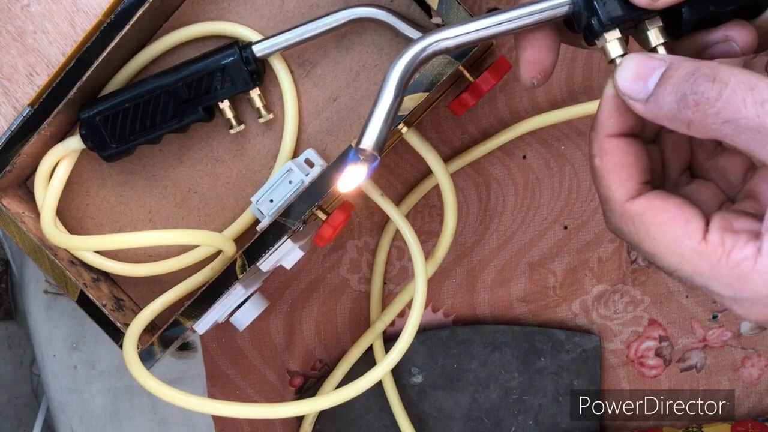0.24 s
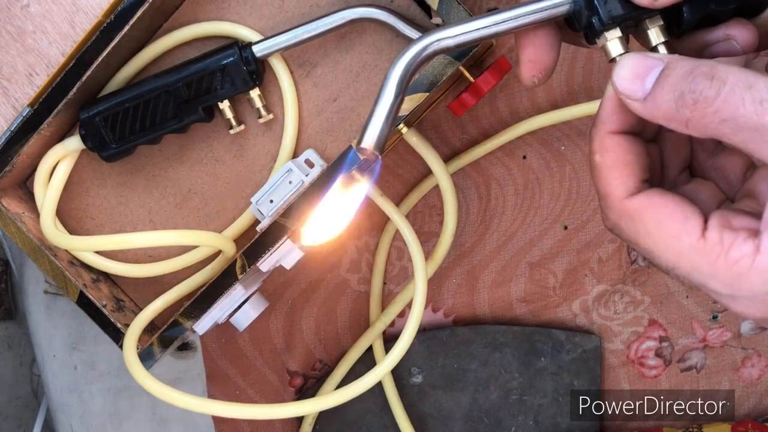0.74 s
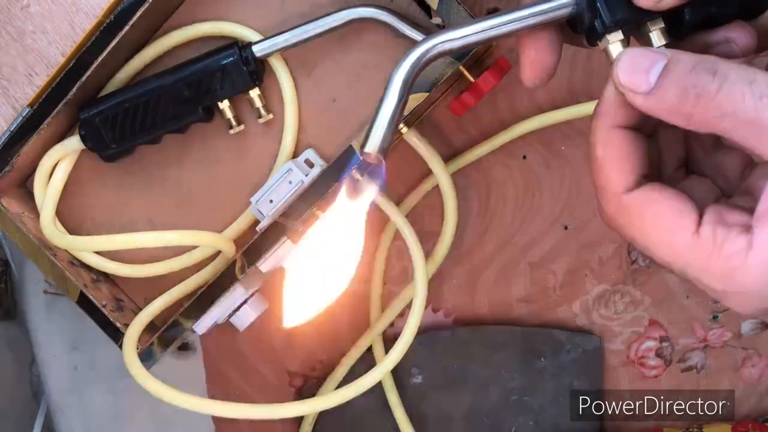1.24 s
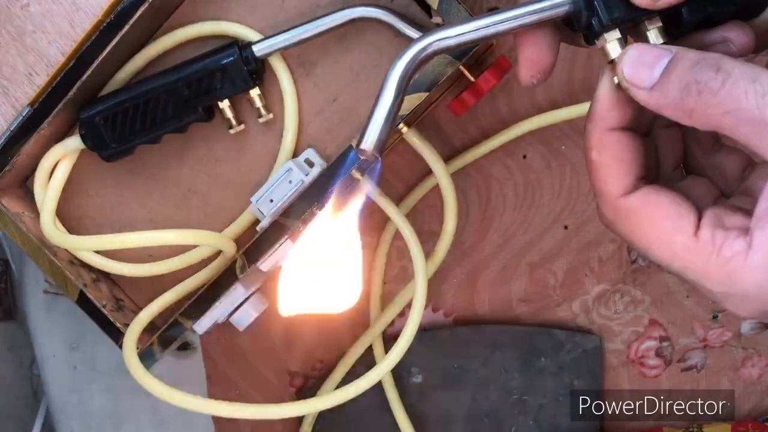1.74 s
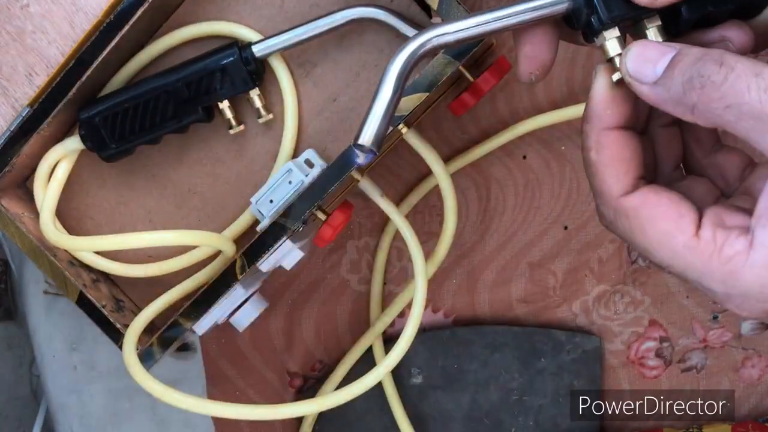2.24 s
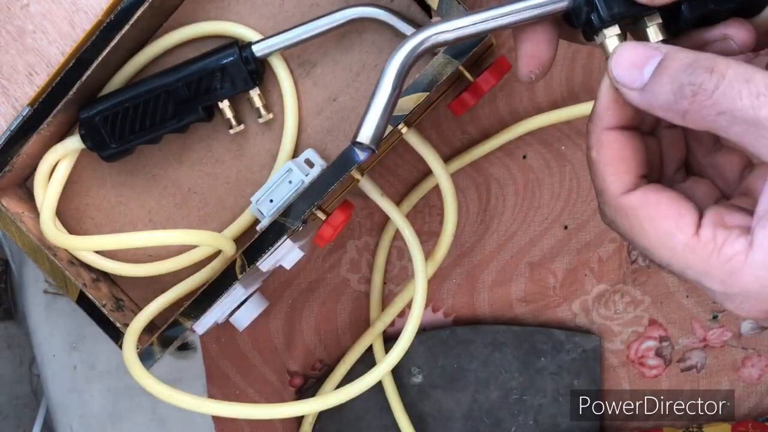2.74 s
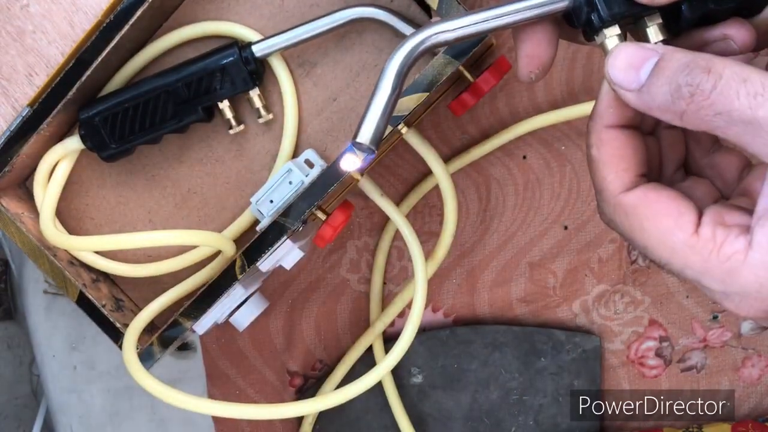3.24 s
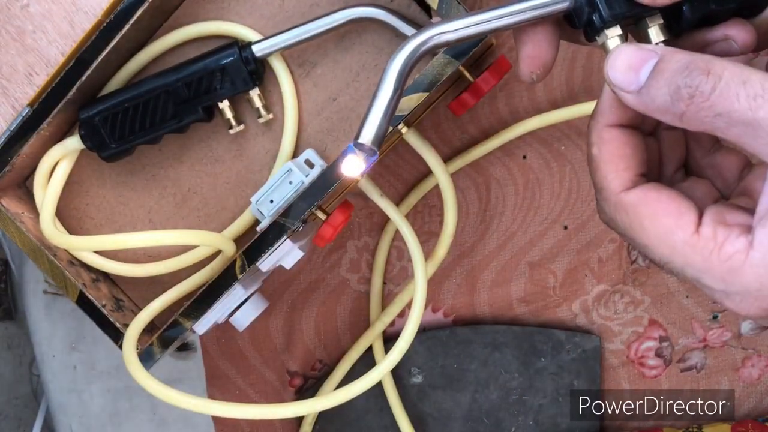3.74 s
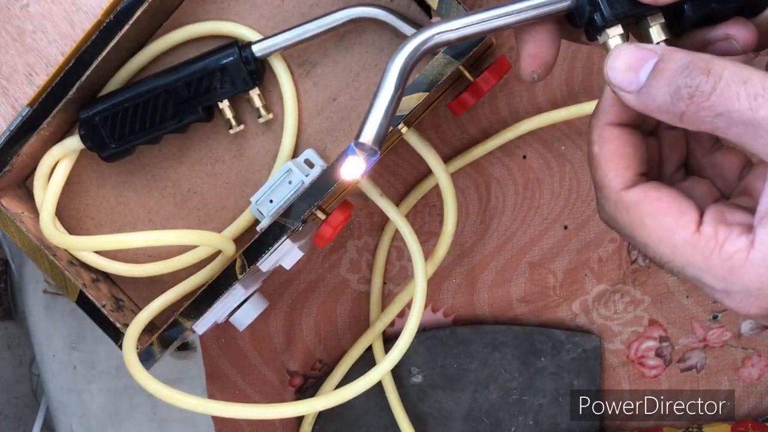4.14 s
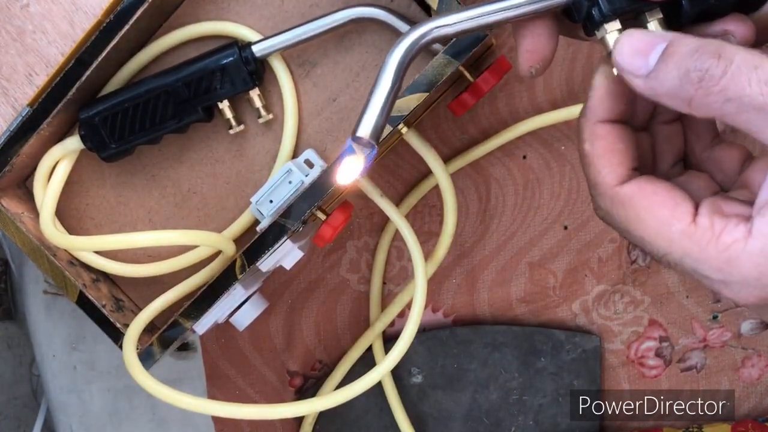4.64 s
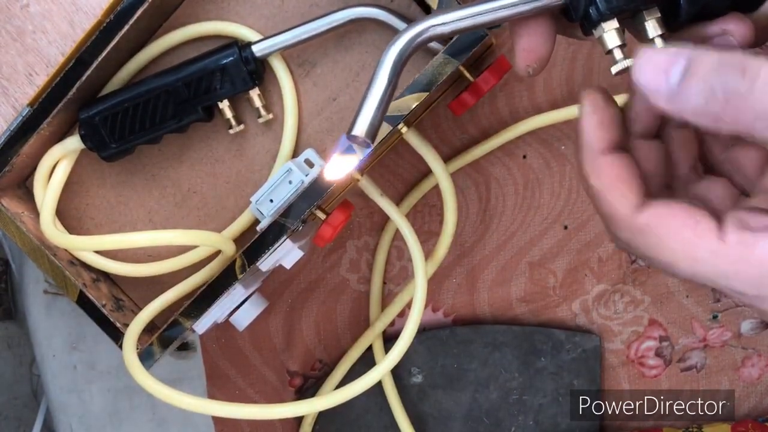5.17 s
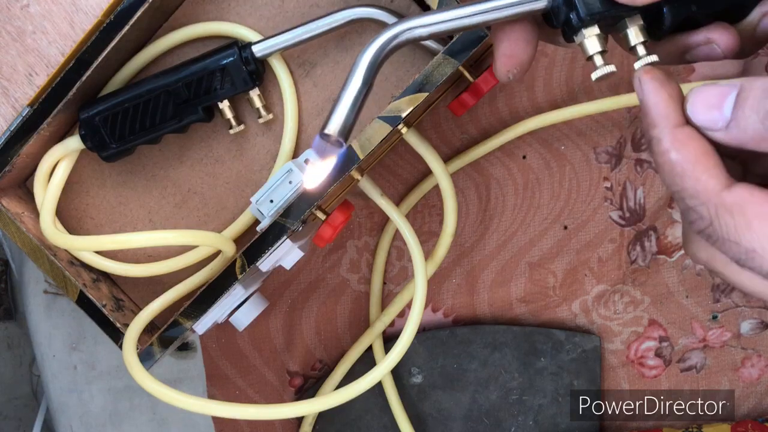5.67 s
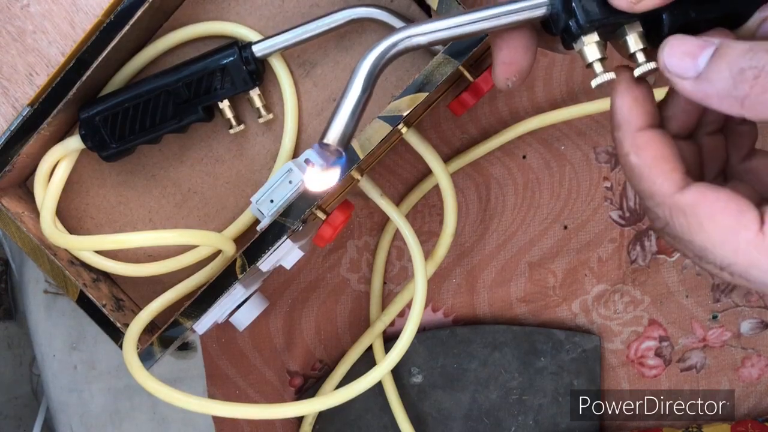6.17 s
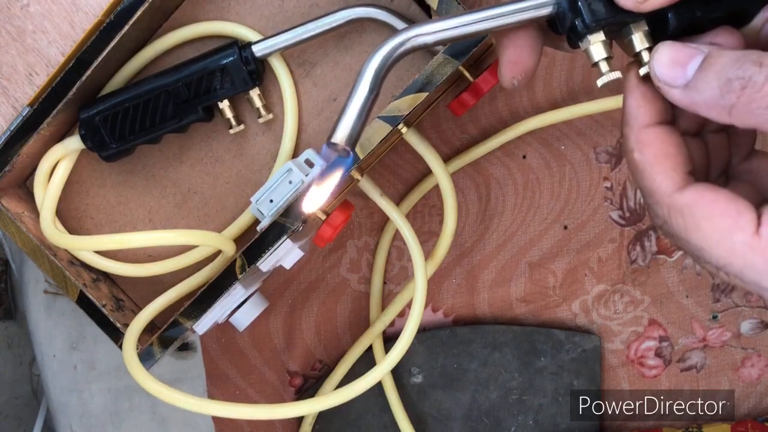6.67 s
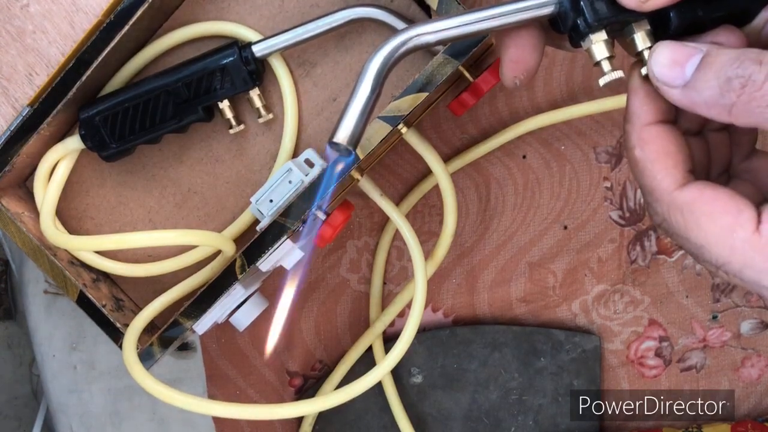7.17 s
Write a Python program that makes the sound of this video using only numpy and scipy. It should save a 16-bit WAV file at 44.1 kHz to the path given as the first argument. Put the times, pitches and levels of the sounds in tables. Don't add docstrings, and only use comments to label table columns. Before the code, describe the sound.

Low electrical pump hum and distant engine drone underlie a gas flame that creaks, puffs near two seconds, then roars and hisses harder.

```python
import sys
import numpy as np
from scipy import signal
from scipy.fft import rfft, irfft, next_fast_len
from scipy.io import wavfile

SR = 44100
rng = np.random.default_rng(int(sys.argv[2]) if len(sys.argv) > 2 else 0)


def boost(x):
    u = np.asarray(x, float) / 20
    return 10 ** u


def dump(signal):
    limited = np.clip(np.atleast_2d(signal).T, -1, 1)
    pcm = np.round(limited * 32767).astype(np.int16)
    wavfile.write(sys.argv[1], SR, pcm)


N = 326781
TIME = np.arange(N) / SR

# time in seconds, firing rate in Hz, level in dB.
ENGINE = [(0, 61.1, -35), (.3, 63.79, -32.5), (.76, 68.04, -30.5), (1.1, 68.98, -33.5), (1.8, 69.65, -35),
          (2.0, 70.63, -40.5), (2.2, 71.22, -33.5), (2.7, 70.14, -45), (3.1, 72.14, -34.5),
          (3.55, 71.82, -41.5), (3.85, 69.66, -29), (4.25, 68.41, -27.5), (4.62, 67.28, -29),
          (4.9, 65.82, -40), (5.2, 62.72, -31), (5.5, 61.8, -38.5), (5.75, 58.9, -30), (6.0, 59.83, -36),
          (6.35, 60.68, -31.5), (6.7, 59.76, -37.5), (7.0, 60.55, -31), (7.41, 59.16, -31)]
# time in seconds, firing rate in Hz, level in dB.
OTHER_ENGINE = [(5.3, 62.5, -60), (5.55, 66.7, -35), (5.8, 63.9, -46), (6.0, 67.6, -33), (6.2, 69.35, -41),
                (6.45, 74.7, -32.5), (6.62, 72.3, -47), (6.8, 70.3, -36), (6.92, 65.9, -48),
                (7.1, 68.9, -34), (7.41, 69.5, -45)]
# frequency in Hz, density in dB per Hz.
RUMBLE_COLOUR = [(25, -56), (42, -12.5), (71, -6.5), (82, -16.5), (102, -13.5), (150, -23.5), (200, -26.5),
                 (214, -39.5), (247, -50.5), (352, -32.5), (406, -44), (500, -53), (650, -54), (1100, -120)]
# start in seconds, length in seconds, level in dB.
SWELLS = [
    (.1, 0.45, -37),
    (4.4, 0.9, -34.5),
    (5.75, 0.27, -31),
    (6.45, 0.29, -30),
]

MAINS_HZ = 50.05
# time in seconds, level in dB.
HUM = [(0.1, -28.5), (0.7, -27), (1.3, -25.5), (1.9, -25.5), (2.5, -28), (3.1, -28), (3.7, -27.5),
       (4.3, -28), (4.9, -27), (5.5, -28), (6.1, -27.5), (6.7, -28), (7.3, -27)]
# multiple, resonance 0-5, level in dB within it, share of the lean.
HARMONICS = [(6, 0, -5, 0), (7, 0, -2, 0), (5, 3, -9, 0), (10, 5, -6, 0), (15, 5, -7, 0), (9, 0, -18, 0),
             (4, 4, -3, 0), (11, 1, -4, 0), (12, 2, -10, -.55), (13, 2, -4, -.4), (14, 2, -4, .4),
             (16, 2, -14, 0), (18, 3, -5, 0), (19, 3, -2, 0), (20, 3, -11, 0), (21, 3, -13, 0),
             (22, 3, -11, 0)]
JOLT_S = [.0054, .0085, .0077, .0048, .0082, .0077]
# time in seconds, load in dB, panel rattle in dB, panel lean low to high in dB.
PUMP_LOAD = [(0, 1.5, -2.5, -6), (.35, -0.5, 4.5, -9), (.5, 3.5, -5, 0), (.6, 0, 7.5, 8), (1.0, 4.5, 7, 7),
             (1.2, -1, 5.5, -3), (1.5, 2.5, 6.5, 4), (1.85, -1, 5.5, -5), (2.05, 2.5, 10, 2),
             (2.22, 5.5, 1, 10), (2.33, -6, 5, -2), (2.55, -6, -2, -9), (3.2, -9, 0.5, 4),
             (3.45, -8, 6.5, 3), (3.62, -8, 10, 1), (3.8, -2.5, 7, -7), (4.0, -1, 1, -7),
             (4.25, -1.5, -0.5, -11), (4.5, 1, -7.5, -18), (5.0, 3, -0.5, 1), (5.8, 1.5, 0, 5),
             (6.5, 1, -1.5, 4), (7.1, 4, 7, 6), (7.41, 4.5, 6, 5)]
# level in dB, share of the load, share of the rattle.
CASING = [
    (-52, 0.84, 0.042),
    (-52, 0.24, 0.94),
]
# time in seconds, base in dB, bracket in dB, grille in dB.
PARTS = [(0, -46, -48.5, -59), (.65, -59, -50, -56), (.85, -60, -62, -54.5), (1.2, -54, -52, -52.5),
         (1.85, -53.5, -52.5, -51), (2.05, -51, -58, -54.5), (2.45, -49, -53, -61), (2.65, -47.5, -49, -70),
         (3.05, -52, -50.5, -69), (3.4, -50.5, -52, -59), (3.9, -49, -50.5, -73), (4.6, -55, -49.5, -58),
         (5.0, -54.5, -51, -57), (5.9, -48.5, -48.5, -55), (6.3, -49, -47, -56), (6.7, -53, -51, -57),
         (6.9, -47.5, -47, -54), (7.41, -60, -69, -51)]
# time in seconds, peak in dB.
ARMATURE_TICKS = [(0.1818, -75), (0.2037, -73), (0.2835, -71), (0.4038, -72), (0.5604, -67), (0.7195, -69),
                  (1.0194, -70), (1.0628, -67), (1.1191, -70), (1.3192, -68), (1.3636, -71), (1.401, -70),
                  (1.4594, -66), (1.4798, -66), (1.5397, -68), (1.5801, -67), (1.6389, -67), (1.6789, -69),
                  (1.6988, -69), (1.7188, -70), (1.7407, -64), (1.818, -64), (1.8604, -69), (1.8809, -69),
                  (1.9183, -67), (1.9807, -67), (2.0625, -66), (2.0994, -68), (2.1204, -67), (2.2181, -70)]

# time in seconds, peak in dB, pitch in Hz.
CREAKS = [
    (0.1457, -46, 2860),
    (0.206, -42, 2700),
    (0.285, -43, 2860),
    (0.2914, -46, 2080),
    (0.3476, -38, 2920),
    (0.4064, -45, 2460),
]
# time in
# seconds, pitch in Hz, width in Hz (0 for a pure note), length in seconds, level in dB.
PUFFS = [(1.9, 175, 0, .02, -42), (1.903, 340, 0, .022, -43), (1.92, 460, 0, .015, -51),
         (1.904, 255, 0, .008, -44), (2.078, 185, 0, .014, -39), (1.865, 175, 0, .015, -48),
         (1.95, 365, 0, .015, -50), (2.03, 190, 0, .025, -46), (2.0, 325, 0, .025, -48),
         (2.12, 310, 80, .04, -52), (2.045, 850, 350, .05, -49), (2.16, 175, 0, .02, -48),
         (1.5, 62, 0, .17, -41), (2.4, 88, 0, .12, -49), (3.4, 86, 0, .12, -47), (2.9, 250.25, 0, .5, -64),
         (3.3, 175, 0, .06, -52), (4.35, 175, 0, .06, -52), (4.5, 135, 0, .08, -49),
         (4.2, 620, 0, .09, -57), (5.65, 480, 25, .07, -55), (6.94, 1480, 0, .02, -56),
         (.3, 3700, 150, .16, -72), (.33, 1650, 300, .03, -64), (.3, 142, 50, .17, -45),
         (2.75, 143, 0, .14, -47), (3.05, 188, 0, .06, -50), (3.42, 143, 0, .12, -47),
         (5.1, 190, 0, .1, -50), (5.39, 545, 0, .04, -52), (7.33, 410, 40, .05, -52),
         (6.64, 964, 0, .125, -52), (6.88, 965, 0, .04, -58), (2.08, 1600, 900, .04, -63),
         (3.05, 1550, 400, .5, -64), (3.05, 106, 0, .1, -46), (2.1, 720, 200, .06, -53),
         (.31, 3400, 3500, .14, -65), (.065, 12500, 3000, .003, -69), (6.7, 1320, 0, .12, -59)]
# pitch in Hz, width in Hz, level in dB.
WHISTLES = [(8550, 150, -12), (11000, 200, -14), (12670, 150, -14), (14080, 260, -6), (15450, 450, -6)]
# start in seconds, length in seconds, top whistle in dB, lower whistles in dB.
VALVE_SPELLS = [
    (0, .55, -82, -95),
    (.55, 0.4, -79, -89),
    (.97, .2, -75, -80),
    (1.22, .1, -82, -90),
    (1.37, .2, -72, -77),
    (1.58, .24, -73, -75),
    (1.82, 0.1, -78, -76),
    (1.92, .14, -78, -84),
]
# start in seconds, length in seconds, level in dB.
NOZZLE_SPELLS = [
    (5.12, 0.19, -57),
    (6.12, 0.23, -57),
    (7.0, 0.17, -52.5),
    (7.32, 0.09, -54),
]
# start in seconds, length in seconds, level in dB.
EDGE_SPELLS = [
    (5.27, .38, -81),
    (5.7, 1.0, -80),
    (6.7, .8, -77),
]

# time in seconds, flow in dB.
FLOW = [(0, -4.5), (.55, -4), (1.2, -4), (1.6, -1.5), (1.9, -2.5), (2.3, -1.5), (2.8, 1), (3.55, 2.5),
        (4.0, 3), (4.5, 3.5), (5.2, 3), (5.8, 1.5), (6.2, 1.5), (6.6, 3), (7.1, 5), (7.41, 6.5)]
# time in seconds, length in seconds, rise in dB.
FLARES = [
    (0.3, 0.093, 5.5),
    (2.06, 0.18, 6),
]
# level in dB, share of the flow, share of a flare, gain when blue in dB,
# gain with full air in dB.
LAYERS = [
    (-53, 0.45, 0.71, 2.5, 1),
    (-54.5, 0.98, 0.52, -1, 2.5),
    (-60, 1, 0.43, 0.78, 0.04),
    (-66, 0.96, 0.22, -0.43, 0.2),
]
# frequency in Hz, density in dB per Hz.
LOW_ROAR = [(150, -9), (225, -11), (270, -10), (349, -16), (411, -12), (546, -9), (832, -14), (1100, -15),
            (1430, -21.5), (2420, -120)]
# frequency in Hz, density in dB per Hz.
ROAR = [(530, -54), (900, 2.5), (921, 4), (1000, 2), (1100, -6), (1490, 0), (1970, -7), (2090, -14.5),
        (2270, -12), (2700, -22), (3510, -50), (5940, -120)]
# frequency in Hz, density in dB per Hz.
LEAN_ROAR = [(530, -52), (900, -11), (925, 1), (973, -4), (1090, -10.5), (1350, -5.5), (1600, -9.5),
             (1950, -10.5), (2150, -20), (2700, -16), (3510, -26), (5940, -120)]
# frequency in Hz, density in dB per Hz.
HISS = [(1410, -19), (2400, -1.5), (2710, -3), (3310, 1), (4190, -6), (4960, -11.5), (6250, -7.5),
        (7800, -17.5), (10100, -56), (17200, -120)]
# frequency in Hz, density in dB per Hz.
LEAN_HISS = [(1410, -23), (2400, -2), (2770, -4.5), (3000, -1.5), (3560, -4), (4860, -11), (5420, -8.5),
             (7800, -19), (10100, -27), (17200, -120)]
# frequency in Hz, density in dB per Hz.
JET = [(4290, 2), (7300, -4.5), (7770, -3), (9650, -2), (10400, -2.5), (15100, -2.5), (16000, -0.5)]
# delay in seconds, level in dB.
ECHOES = [(.0083, -27), (.0131, -27), (.0197, -28)]
# frequency in Hz, width
# in Hz, gain at the centre in dB.
PORT_RESONANCES = [(2100, 330, 2.5), (4950, 230, -1.5), (7720, 630, -4), (10400, 630, -5.5)]


def in_time(rows):
    s, *columns = np.transpose(rows)
    return [np.interp(TIME, s, column) for column in columns]


def rms_one(x):
    return x / np.sqrt(np.mean(x ** 2) + 1e-20)


def drift(rate):
    r = np.exp(-80 * np.pi * rate / SR)
    noise = rng.standard_normal(N // 40 + 2002)
    slow = signal.lfilter([1], [1, -2 * r, r * r], noise)[2000:]
    return np.interp(np.arange(N) / 40, np.arange(len(slow)), rms_one(slow))


def spells(rows, fade_s, column=2):
    gain = np.zeros(N)
    for row in rows:
        start, length = row[:2]
        inside = np.minimum(TIME - start, start + length - TIME)
        gain += boost(row[column]) * np.clip(inside / fade_s + .5, 0, 1)
    return gain


def coloured(spectrum, flicker_db, rate, grain_db=0):
    hz, level_db = np.transpose(spectrum)
    size = next_fast_len(N)
    grid = np.arange(size // 2 + 1) * SR / size + 1e-3
    colour = boost(np.interp(np.log(grid), np.log(hz), level_db, -120, -120))
    shaped = rfft(rng.standard_normal(size)) * colour
    place = np.clip(2 * np.log(grid / hz[0]) / np.log(hz[-1] / hz[0]), 0, 2)
    together = drift(rate)
    out = np.zeros(N)
    for k in range(3):
        band = irfft(shaped * np.clip(1 - abs(place - k), 0, 1), size)[:N]
        out += band * boost(flicker_db * (together + drift(2 * rate)) + grain_db * drift(69))
    return rms_one(out)


def resonance(x, hz, width_hz):
    r = np.exp(-np.pi * width_hz / SR)
    poles = [1, -2 * r * np.cos(2 * np.pi * hz / SR), r * r]
    return signal.lfilter(np.array([1, 0, -1]) * (1 - r * r) / 2, poles, x)


def twice_resonant(x, hz, width_hz):
    return resonance(resonance(x, hz, width_hz), hz, width_hz)


def tone(hz, level_db, wobble=0.):
    phase = 2 * np.pi * np.cumsum(hz + 0 * TIME) / SR
    return np.sqrt(2) * boost(level_db) * np.cos(phase + wobble)


def street():
    hz, level_db = in_time(ENGINE)
    other_hz, other_db = in_time(OTHER_ENGINE)
    engines = tone(hz, level_db, .35) + tone(other_hz, other_db, .1 * drift(3.1))
    near = np.clip((TIME - 5.0) / 1.7, .03, 1)
    engines += near * tone(90.15, -40 + 1.2 * drift(3.1), 2.44 + .2 * drift(3.1))
    rumble_gain = np.hypot(boost(-37.5), spells(SWELLS, 1.0))
    rumble = rumble_gain * coloured(RUMBLE_COLOUR, flicker_db=0.53, rate=2.7)
    return engines + signal.sosfilt(signal.butter(6, 46, "high", fs=SR, output="sos"), rumble)


def pump():
    out = tone(MAINS_HZ, in_time(HUM)[0] + .3 * drift(3.8), 1.9)
    out += tone(2 * MAINS_HZ, -46 + .6 * drift(3.0), -2.3 + .2 * drift(3.0))
    load_db, rattle_db, lean_db = in_time(PUMP_LOAD)
    base_db, bracket_db, grille_db = in_time(PARTS)
    shell_db, panel_db = [db + loaded * load_db + rattled * rattle_db for db, loaded, rattled in CASING]
    resonances_db = [shell_db, bracket_db, panel_db, grille_db, base_db, shell_db]
    wander = [.2 * drift(1.2) for _ in resonances_db]
    buzz_db = -1
    for multiple, group, within_db, lean_share in HARMONICS:
        hz = multiple * MAINS_HZ
        level_db = resonances_db[group] + within_db + lean_share * lean_db + buzz_db + .7 * drift(2.0)
        out += tone(hz, level_db, -2 * np.pi * hz * JOLT_S[group] + wander[group])
    return out


def armature():
    s, peak_db = np.transpose(ARMATURE_TICKS)
    clicks = np.full(N, 1e-18)
    clicks[(s * SR).astype(int)] = boost(peak_db - 3.0)
    rung = twice_resonant(clicks, 11980, 150)
    return rung * clicks.max() / abs(rung).max()


def puffs():
    out = np.zeros(N)
    for s, hz, width_hz, length, level_db in PUFFS:
        near = abs(TIME - s) < 4 * length
        swell = np.exp(-((TIME[near] - s) / length) ** 2)
        if width_hz:
            body = twice_resonant(rng.standard_normal(len(swell)), hz, width_hz)
        else:
            body = np.cos(2 * np.pi * hz * TIME[near])
        puff = swell * body
        out[near] += boost(level_db + 2) * puff * np.sqrt(np.sum(swell ** 2) / np.sum(puff ** 2))
    return out


def creaks():
    out = np.zeros(N)
    after = np.arange(2000) / SR
    for s, peak_db, hz in CREAKS:
        rasp = rng.standard_normal(2000) * np.exp(-after / .01) * (1 - np.exp(-after / .002))
        rasp = twice_resonant(resonance(rasp, hz, 3000), 4300, 4000)
        start = round((s - .004) * SR)
        out[start:start + 2000] += boost(peak_db - 10.5) * rasp / abs(rasp).max()
    return out


def whistles():
    air = rng.standard_normal(N)
    *lower, top = [boost(db) * twice_resonant(air, hz, width_hz) for hz, width_hz, db in WHISTLES]
    valve = spells(VALVE_SPELLS, .08) * rms_one(top)
    valve += spells(VALVE_SPELLS, .08, column=3) * rms_one(sum(lower))
    out = boost(2.2 * drift(25) + 1.5 * drift(6)) * valve
    out += spells(EDGE_SPELLS, .05) * rms_one(twice_resonant(air, 15600, 250))
    return out + spells(NOZZLE_SPELLS, 0.21) * rms_one(twice_resonant(air, 1002.6, 25))


def workshop(x):
    hand_delay = .0029 + .00003 * drift(0.32)
    out = x - boost(-21) * np.interp(TIME - hand_delay, TIME, x)
    for delay, level_db in ECHOES:
        lag = round(delay * SR)
        out[lag:] += boost(level_db) * x[:-lag]
    return out * np.sqrt(np.mean(x ** 2) / np.mean(out ** 2))


def flame():
    flow_db, = in_time(FLOW)
    flare_db = sum(db * np.exp(-((TIME - s) / length) ** 2) for s, length, db in FLARES)
    blue = np.clip((TIME - 1.68) / 0.19, 0, 1)
    air = np.clip((TIME - 5.14) / 0.97, 0, 1)
    gains = []
    for level_db, flow_share, flare_share, blue_db, air_db in LAYERS:
        driven_db = flow_share * flow_db + flare_share * flare_db
        gains.append(boost(level_db + driven_db + blue_db * blue + air_db * air))
    low_gain, roar_gain, hiss_gain, jet_gain = gains
    soft, lean = np.sqrt(1 - air), np.sqrt(air)
    roar = soft * coloured(ROAR, 0.4, 7.8) + lean * coloured(LEAN_ROAR, 0.31, 3.8)
    hiss = soft * coloured(HISS, 0.33, 8.1, grain_db=0.65)
    hiss += lean * coloured(LEAN_HISS, 0.41, 5.8, grain_db=0.7)
    out = low_gain * coloured(LOW_ROAR, flicker_db=0.55, rate=7.3)
    out += roar_gain * roar + hiss_gain * hiss
    return out + jet_gain * coloured(JET, flicker_db=0.64, rate=13.0, grain_db=0.5)


def scene():
    background = street() + pump() + armature()
    torch = puffs() + creaks() + whistles() + workshop(flame())
    return (background + torch)[None]


def roll_off(x):
    return signal.sosfilt(signal.butter(12, 16430, fs=SR, output="sos"), x)


def record(dry):
    x = dry * np.clip(TIME / .0005, 0, 1)
    for hz, width_hz, depth_db in PORT_RESONANCES:
        x = x - (1 - boost(depth_db)) * resonance(x, hz, width_hz)
    x = signal.sosfilt(signal.ellip(14, .3, 50, 15720, fs=SR, output="sos"), x)
    return roll_off(x)


dry = scene()
out = record(dry)
dump(out)
```